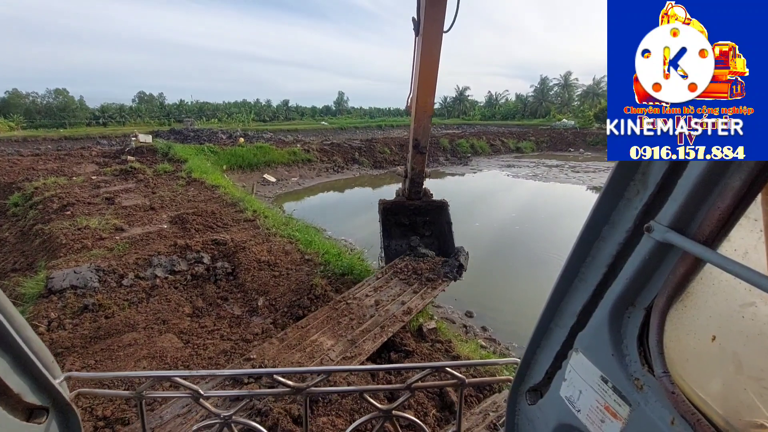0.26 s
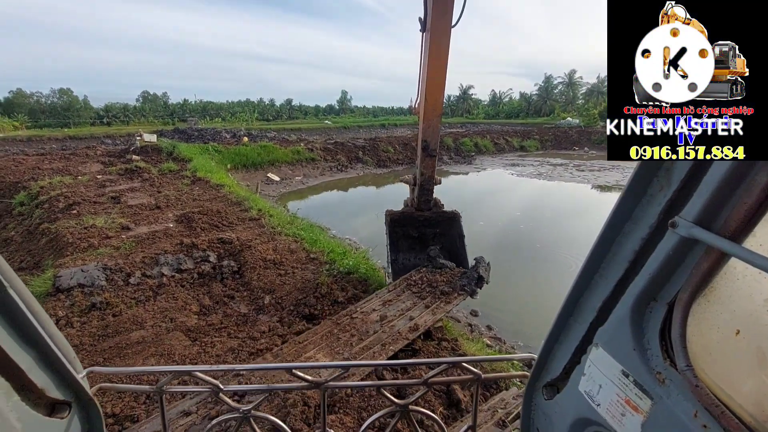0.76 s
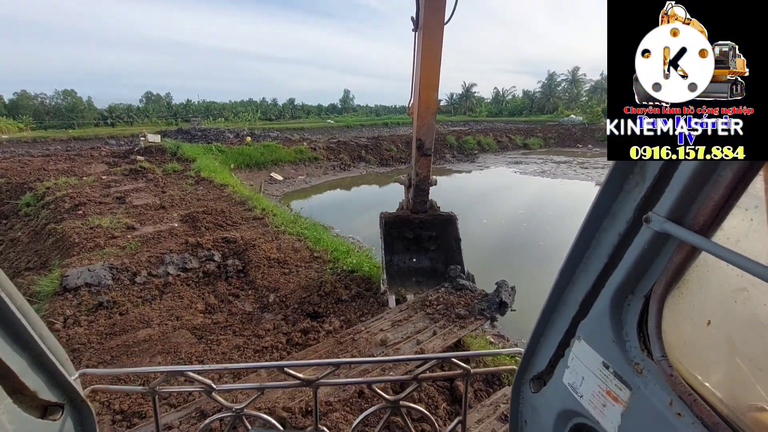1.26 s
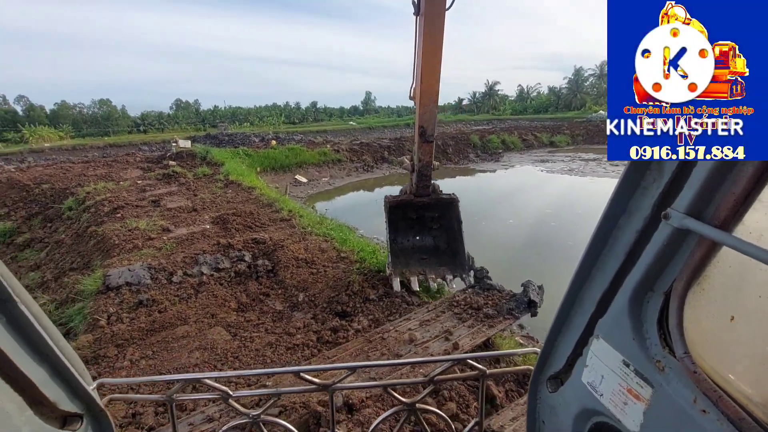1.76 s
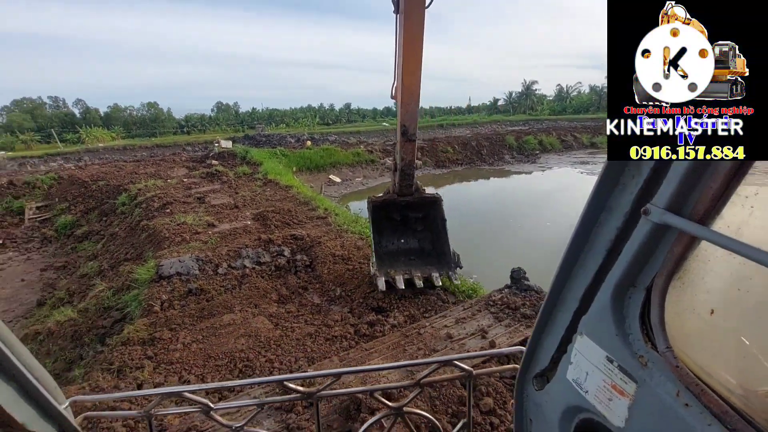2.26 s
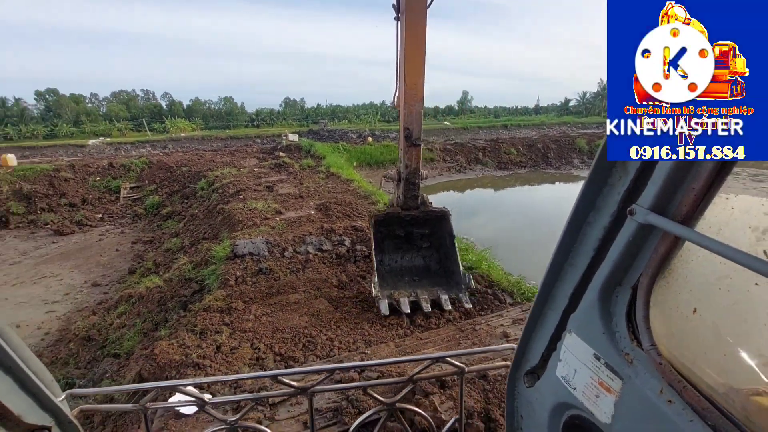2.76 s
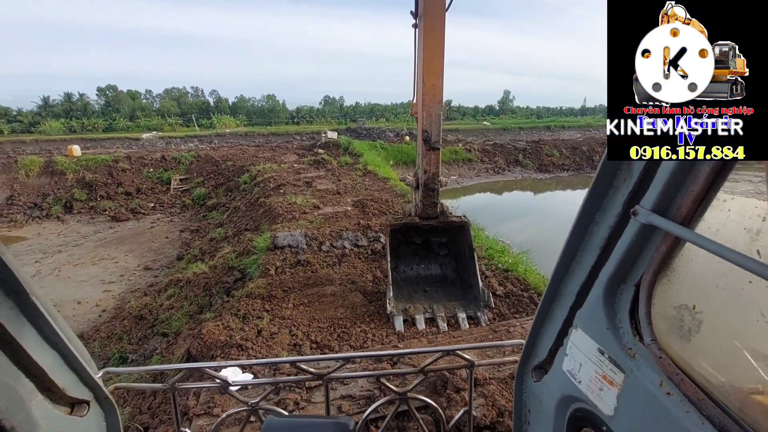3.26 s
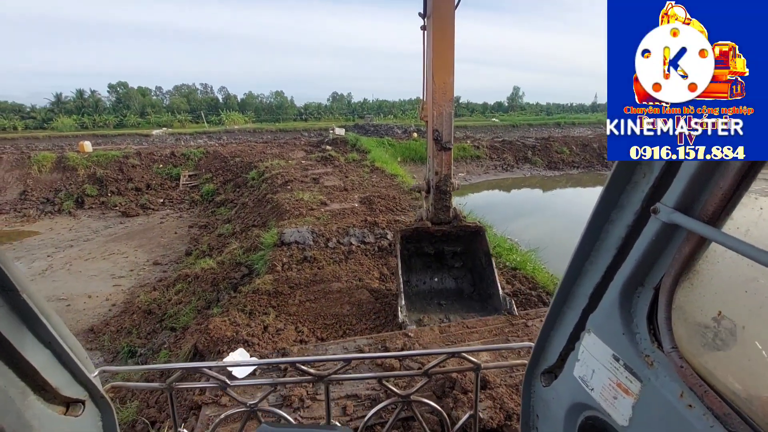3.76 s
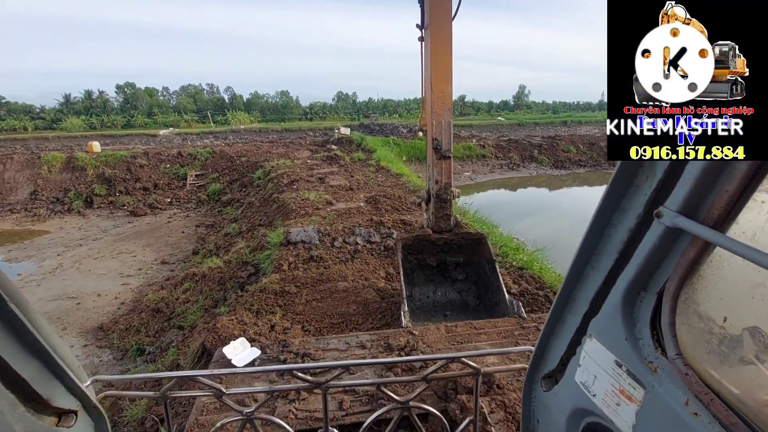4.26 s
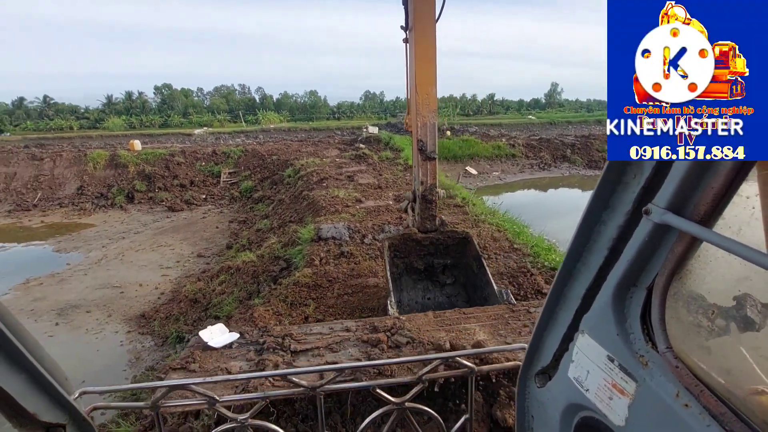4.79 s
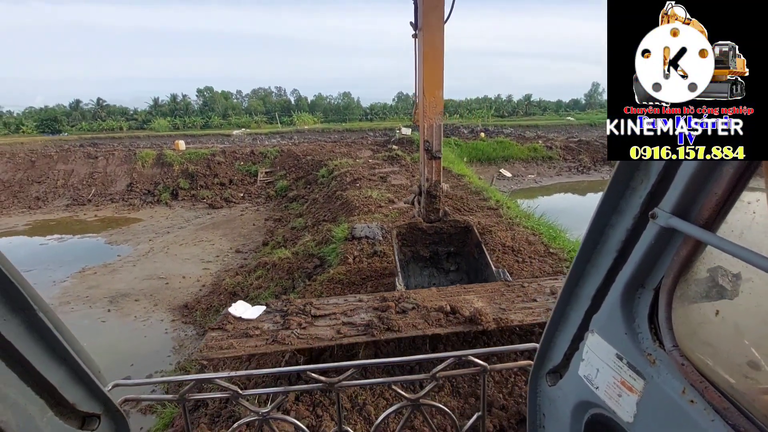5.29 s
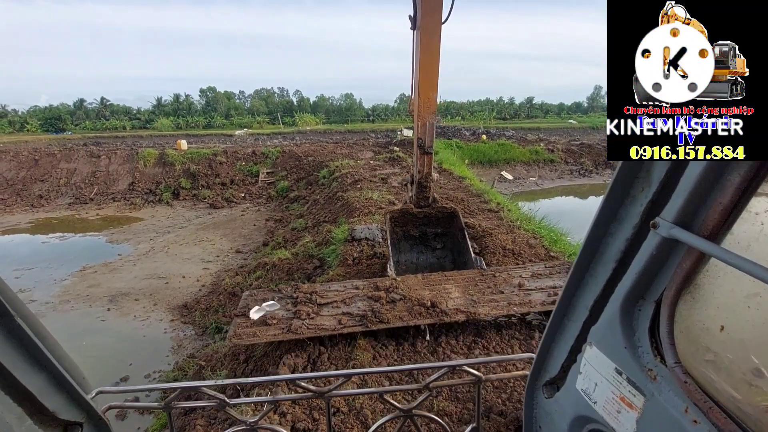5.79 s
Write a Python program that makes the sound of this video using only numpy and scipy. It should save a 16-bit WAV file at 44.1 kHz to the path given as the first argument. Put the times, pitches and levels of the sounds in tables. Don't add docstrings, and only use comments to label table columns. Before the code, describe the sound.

A heavy digger works as heard from its seat: a muffled diesel drone beneath booming cab panels, dull frame blows, bright pin taps and thin hydraulic hiss. Clatter comes in bursts, strongest early and again near three seconds, with a quieter middle between. Around four seconds dry joints squeak softly, then a swing motor hum and gear whine rise among renewed knocks. Close, boxy, bass-heavy stereo sound, with peaks softly squashed.

```python
import sys
import numpy as np
from scipy import signal
from scipy.io import wavfile
from scipy.ndimage import uniform_filter1d

SR = 44100
rng = np.random.default_rng(int(sys.argv[2]) if len(sys.argv) > 2 else 0)


def decibels_to_gain(level_db):
    exponent = np.asarray(level_db, float) / 20
    return 10 ** exponent


def wrap_up_sound(samples):
    columns = np.atleast_2d(samples).T
    tamed = np.clip(columns, -1, 1)
    steps = np.round(tamed * 32767).astype(np.int16)
    wavfile.write(sys.argv[1], SR, steps)


N = 265923

# hz, width_hz, level_db
CAB_MODES = [(58.4, 48, -5), (68.3, 24, -4.5), (132.5, 20, 3.5), (160.7, 23, -5.5), (230.2, 17.3, -3),
             (282.9, 27, -6.5), (392, 15, -7), (447, 180, -11)]
# hz, level_db (per Hz)
RUMBLE = [(15, -43), (25, -50), (54, -28), (144, 1), (188, -11.5), (247, -7), (332, -14.5), (385, -14),
          (846, -20), (1060, -22), (1650, -22.5), (2690, -35), (9000, -60), (11700, -90), (19800, -120)]
# peak_s, level_db, length_s
LURCHES = [(.1, -18, 0.037), (.33, -9, 0.14), (.42, -7, 0.0089), (.55, -23, 0.28), (1.07, -8, 0.062),
           (1.21, -3, 0.1), (1.405, -6.5, 0.12), (2.35, -20, 0.019), (2.47, -28, .04), (2.66, -10, 0.088),
           (2.79, -6.5, 0.2), (2.94, -3, 0.036), (3.04, -16, 0.022), (3.125, -8.5, 0.12),
           (3.295, -15, 0.075), (3.375, -2, 0.012), (3.458, -2.5, 0.014), (3.58, -8, 0.044),
           (4.12, -12, 0.097), (4.38, -20, 0.035), (4.58, -22, 0.1), (4.89, -8.5, 0.11), (4.99, -6, 0.037),
           (5.13, -4, 0.03), (5.3, -6, 0.034), (5.42, -10, 0.082), (5.62, -6.5, 0.25), (5.89, -23, 0.027),
           (6.0, -3, 0.017)]
# peak_s, level_db, length_s
SURGES = [(.05, -28, 0.24), (.2, -27.5, 0.17), (.36, -48, .04), (1.27, -46, 0.034), (1.9, -32.5, 0.044),
          (3.0, -29, 0.029), (5.32, -30, .06), (5.97, -23.5, 0.11), (2.75, -30, 0.11), (3.57, -40, 0.038),
          (1.17, -23, .03), (4.05, -37, 0.13)]


def cab_rumble():
    lurch = swells(LURCHES, rise_share=0.71, fall_share=0.59)
    boom_gain = np.sqrt(decibels_to_gain(2 * follows(-18, 0.96)) + decibels_to_gain(2 * -8) * lurch)
    drum_gain = np.sqrt(decibels_to_gain(2 * follows(-22, 1)) + decibels_to_gain(2 * -10.5) * lurch)
    clatter_gain = np.sqrt(decibels_to_gain(2 * follows(-33.5, 1.15)) + swells(SURGES, 0.79, 0.52))
    white = rng.standard_normal((2, 2, N))
    jolts = rng.standard_normal((2, N)) * decibels_to_gain(2.0 * drift(19.0))
    modes = []
    for hz, width_hz, db in CAB_MODES:
        ring = resonance(resonance(jolts, hz, 1.04 * width_hz), hz, 1.04 * width_hz)
        modes.append(decibels_to_gain(db) * pair(ring, hz) / np.sqrt(width_hz))
    boom = rms_one(sum(modes[:4])) + 0.5 * coloured(white, RUMBLE, 35.4, 191.0, count=5, patchy_db=2.5)
    drum = 0.62 * rms_one(sum(modes[4:]))
    drum = drum + 0.77 * coloured(white, RUMBLE, 193.0, 908, count=5, patchy_db=2.5)
    touches = (rng.random(N) < 300 / SR) * decibels_to_gain(0.71 * np.minimum(rng.exponential(1, N), 3))
    rattle = 1 + 0.35 * signal.lfilter([1], [1, -0.99], touches)
    clatter = coloured(white * rms_one(rattle), RUMBLE, 800, 9000, count=8, patchy_db=0.8)
    return boom_gain * evened(boom, span_s=0.08) + drum_gain * drum + clatter_gain * clatter


# start_s, peak_db, pitch_hz, length_s
MODE_JOLTS = [(.075, -15, 131, .045), (0.242, -9, 68, 0.17), (.326, -1, 136.5, 0.029),
              (0.404, 0.5, 130.5, 0.022), (1.152, -26, 289.5, 0.23), (1.185, -14, 148, 0.027),
              (1.197, -14, 74.4, 0.064), (1.388, -5.5, 133, 0.04), (1.695, -18, 525, 0.023),
              (1.722, -16.5, 411, 0.028), (2.629, -8.5, 77, 0.041), (2.72, -9, 226.5, 0.042),
              (2.767, -5.5, 120, 0.035), (2.916, -9.5, 126, 0.048), (2.976, -8.5, 378.7, 0.047),
              (2.997, -11, 229.7, 0.066), (3.025, -11, 137, 0.041), (3.1, -9, 140, 0.057),
              (3.134, -11.5, 60, 0.1), (3.27, -8.5, 136, 0.06), (3.302, -9.5, 67.7, 0.057),
              (3.359, -5.5, 140, 0.03), (3.447, 2, 139, 0.018), (3.473, -12.5, 466.5, 0.042),
              (3.486, -13.5, 422, 0.028), (3.547, -14.5, 297.4, 0.053), (3.602, -19.5, 229.4, 0.084),
              (4.87, -7.5, 134, 0.025), (4.95, -7, 135.8, 0.078), (5.185, -13, 139, .04),
              (5.258, -2, 138.4, 0.051), (5.4, -6, 135.7, 0.072), (5.459, -13.5, 379, 0.075),
              (5.58, -6.5, 154, 0.038), (5.602, -26, 67.4, 0.33), (5.621, -5.5, 238, 0.025),
              (5.659, -20, 129, 0.055), (5.872, -12, 134, 0.026), (5.988, -8, 143, 0.022),
              (1.363, -6, 895, 0.0048), (1.373, -11, 493, 0.013), (1.395, -8, 1220, 0.0032),
               (1.487, -23, 1100, 0.0046), (1.146, 0.5, 387, 0.006), (1, -17, 2100, 0.0028),
               (3.337, -15, 2400, .003), (3.464, -22, 3030, 0.0034), (.06, -26, 217, 0.135),
               (3.11, -10.5, 350, 0.026), (4.9, -14, 306, 0.027), (5.073, -6.5, 330, 0.018),
               (0.141, -15, 260, 0.027), (0.187, -11.5, 259, .03), (2.937, -8.5, 275, 0.021),
               (3.057, -19, 250, 0.02), (2.5, -10, 267, 0.02), (.662, -14.5, 437, 0.017),
               (3.4, -10.5, 453, 0.015)]


def booms():
    peak_share, sag = 0.35, 0.0291
    out = np.zeros(N + SR)
    for s, db, hz, length in MODE_JOLTS:
        t = np.arange(round(4 * length * SR)) / SR
        grown = t / (peak_share * length)
        tone = np.sin(2 * np.pi * hz * t * (1 - sag * t / length))
        at = round(s * SR)
        out[at:at + len(t)] += decibels_to_gain(db) * grown * np.exp(1 - grown) * tone
    return out[:N] * decibels_to_gain(np.array([[-1.3], [1.3]]))


# start_s, peak_db, pitch_hz, chatter_s
SLAMS = [
    (.393, -4.5, 2680, 0.0084),
    (1.139, -3, 3360, 0.014),
    (2.993, -5, 4530, 0.012),
]
# start_s, peak_db, pitch_hz, chatter_s
PINS = [
    (.549, -16.5, 1910, 0.019),
    (.799, -25, 730, 0.037),
    (1.124, -18, 719, 0.028),
    (1.848, -15.5, 1690, 0.041),
    (2.407, -21.5, 1120, 0.017),
    (2.699, -17.5, 855, 0.053),
    (4.07, -21.5, 1164, 0.12),
    (4.304, -25, 1150, 0.033),
    (4.628, -24, 760, 0.0059),
]
# start_s, peak_db, pitch_hz, chatter_s
LATCH = [
    (.993, -22, 1090, 0.013),
    (1.214, -13.5, 2140, 0.031),
    (1.419, -18, 1750, 0.028),
    (2.464, -22, 1010, 0.035),
    (2.499, -21, 990, 0.021),
    (2.923, -15.5, 1900, 0.006),
    (3.462, -14, 2000, 0.011),
    (3.337, -16.5, 3970, 0.011),
]
# start_s, peak_db, pitch_hz, chatter_s
DOOR = [(.326, -4.5, 930, 0.0038), (.409, -9, 900, 0.023), (.664, -23, 910, 0.0037),
        (1.04, -10.5, 1050, 0.005), (1.25, -16, 875, 0.015), (1.364, -1.5, 980, 0.012),
        (1.378, -10, 493, 0.026), (1.395, -6.5, 1160, 0.004), (1.486, -22.5, 1000, 0.006),
        (1.696, -17, 830, 0.038), (1.727, -18, 1630, 0.022), (1.986, -14.5, 813, 0.036),
        (2.022, -18.5, 2250, 0.03), (2.313, -15, 845, 0.024), (2.814, -18, 1730, 0.0074),
        (3.108, -15, 1050, 0.011), (3.374, -17.5, 1840, 0.021), (3.45, -7.5, 1080, 0.0088),
        (2.981, -16, 1300, 0.014), (3.6, -20, 1120, 0.021), (3.832, -11, 440, 0.015),
        (3.909, -16, 1050, 0.09), (4.849, -11.5, 980, 0.057), (5.619, -2.5, 447, 0.0089)]
# start_s, peak_db, pitch_hz, chatter_s
FRAME = [(.199, -15, 1050, 0.018), (.283, -15, 960, 0.015), (.503, -18.5, 780, 0.061),
         (1.146, -5.5, 607, 0.0091), (1.153, -9.5, 1988, 0.025), (1.45, -37, 290, .06),
         (1.523, -17, 380, 0.038), (3.02, -10, 251, 0.019), (3.84, -13, 212, 0.097),
         (1.942, -17, 1700, 0.037), (2.105, -19, 2300, 0.043), (2.599, -15.5, 2000, 0.006),
         (3.545, -15, 1080, 0.06), (3.858, -15, 940, 0.031), (4.337, -24, 1190, 0.008),
         (5.115, -15.5, 960, 0.034), (5.473, -10, 930, 0.059), (5.592, -4.5, 844, 0.024),
         (1.652, -27, 1490, .01), (1.668, -30, 2600, 0.0089), (2.06, -20, 846, 0.014),
         (2.142, -19, 1540, 0.015), (2.178, -23, 2360, 0.012), (2.286, -45, 860, .01),
         (3.089, -23, 720, .01), (3.189, -33, 790, 0.012), (3.268, -23, 1400, 0.016),
         (3.295, -19.5, 890, 0.0088), (.35, -18, 880, 0.023), (1.27, -23, 2000, 0.014),
         (5.31, -15.5, 3030, 0.018), (5.612, -17, 1300, 0.023), (3.0, -13, 890, 0.026),
         (3.48, -14.5, 1190, 0.034), (2.304, -17, 1700, 0.012), (2.996, -10.5, 2140, 0.022),
         (2.317, -20.5, 2390, 0.016), (2.544, -27.5, 2200, 0.0096), (2.26, -43, 2200, .01)]
# hz, width_hz, level_db
STEEL_MODES = [(867, 210, -2), (1050, 130, -9.5), (1300, 92, -10.5), (1750, 115, -7), (2000, 150, -8),
               (2380, 230, -13.5)]
# hz, width_hz, level_db
PANEL_MODES = [(295.5, 28, 5), (433.7, 28, 1.5), (405, 87, 4), (502, 76, -4), (598, 4.3, -15)]
# hz, width_hz, level_db
CRACK_MODES = [(2680, 380, 22), (3340, 400, 14), (3840, 510, 14), (4500, 1260, 14), (6150, 830, 6),
               (7300, 850, -40)]


def knocks():
    out, size = np.zeros((2, N + SR)), SR // 6
    t = np.arange(size) / SR
    kinds = [(SLAMS, 0, -12), (PINS, -1.7, -8), (LATCH, 5.2, -7), (DOOR, 2.3, -28.5), (FRAME, 0, -20.5)]
    for blows, panel_db, crack_db in kinds:
        for s, db, hz, chatter_s in blows:
            contact = np.exp(-(t / np.clip(chatter_s, 0.004, 0.08)) ** 1.05) + 0.12 * np.exp(-t / 0.03)
            bounces = rng.standard_normal((2, size))
            edges = np.sign(bounces) * rms_one(np.abs(bounces) ** 1.27) * contact
            rise_s = 0.0019 * decibels_to_gain(-0.35 * db)
            chatter = edges * np.minimum(t / rise_s, 1)
            chatter[0, :30] += 1.6 * decibels_to_gain(0.35 * db) * np.hanning(30)
            own_ring = (hz, 0.13 * hz, -5 * np.log2(hz / 1000))
            clank = struck(chatter, STEEL_MODES + [own_ring])
            panel = struck(chatter, PANEL_MODES)
            crack = struck(edges * np.exp(-t / (4.2 * chatter_s)), CRACK_MODES)
            dull_hz = 3620 * (max(hz, 700) / 1500) ** 0.18
            body = dulled(clank + decibels_to_gain(panel_db - 1.5) * panel, dull_hz)
            at = round(s * SR)
            out[:, at:at + size] += decibels_to_gain(db - 1.5) * (body + decibels_to_gain(crack_db) * dulled(crack, 5800))
    return out[:, :N]


def struck(chatter, modes):
    luck_db = rng.normal(0, 2.5, len(modes))
    out = 0
    for (hz, width_hz, db), extra_db in zip(modes, luck_db):
        ring = resonance(resonance(chatter, hz, width_hz), hz, 4 * width_hz)
        out = out + decibels_to_gain(db + extra_db) / np.sqrt(width_hz) * pair(ring, hz)
    return out / np.abs(out.mean(axis=0)).max()


# hz, width_hz, level_db (re the touch)
SHEET_MODES = [(447, 5.9, -16.5), (583.6, 15, -4), (653, 4.4, -9.5), (850.4, 12.6, 1), (1010, 8.4, -10),
               (1295, 6.9, -4.5), (1640, 15, 1.5), (1980, 14, -9), (2350, 27, -2), (3250, 18, 2),
               (3550, 12, -14), (3940, 45, -6), (4260, 27, 2.5), (4700, 16, -7)]


def sheet_steel(x):
    return x + sum(decibels_to_gain(db) * resonance(x, hz, width_hz) for hz, width_hz, db in SHEET_MODES)


# time_s, twice_firing_hz, level_db
DIESEL = [(0, 256, -23), (.3, 258, -25), (.5, 259, -32), (.7, 260, -28), (1.0, 256, -28), (1.2, 256, -32),
          (1.6, 260, -40), (2.5, 264, -36), (2.9, 266, -30), (3.4, 266, -30), (3.8, 264, -38),
          (4.6, 266, -33), (5.2, 268, -28), (5.72, 260, -27), (5.86, 259, -14), (6.03, 260, -12)]
# multiple, level_db
FIRING_ORDERS = [(.5, -17), (1, -5), (2, 0), (3, -15), (5, -24), (6, -29)]


def diesel():
    twice_hz, level_db = in_time(DIESEL)
    turn = np.pi * np.cumsum(twice_hz * (1 + 0.003 * drift(8.2))) / SR
    tone = sum(decibels_to_gain(db + 0.46 * drift(1.4)) * np.sin(order * turn) for order, db in FIRING_ORDERS)
    return np.sqrt(2) * decibels_to_gain(level_db) * tone * decibels_to_gain(np.array([[-1.3], [1.3]]))


# hz, level_db (per Hz)
HISS = [(3240, -46), (5500, 7), (6810, -29), (7420, 1.5), (8880, -7), (10400, 0.5), (11800, 1.5),
        (12700, 0.5), (14300, -10), (15300, -4)]
# hz, width_hz, level_db (re the hiss)
WHISTLES = [(7200, 60, -17), (11030, 40, -16), (11368, 30, -11), (11709, 40, -13), (12068, 40, -13),
            (12177, 35, -11), (12523, 40, -15)]
# peak_s, level_db, length_s
PUFFS = [(.05, -48, .2), (.4, -54, 0.016), (.56, -50, 0.062), (.8, -51, 0.15), (1.008, -44, 0.0074),
         (1.13, -47.5, 0.072), (1.23, -56, 0.026), (1.345, -44, 0.015), (1.425, -52, 0.046),
         (1.68, -58, 0.12), (2.17, -56.5, 0.035), (2.36, -43.5, 0.023), (2.43, -45.5, 0.044),
         (2.75, -46, 0.2), (2.98, -46, 0.14), (3.28, -37.5, 0.032), (4.08, -47.5, 0.075), (4.32, -58, .05),
         (4.53, -52, 0.067), (4.9, -46, 0.04), (5.25, -30, 0.012), (5.29, -36, 0.011), (5.41, -38, 0.087),
         (5.85, -42.5, 0.13), (6.0, -43, 0.036)]


def valves():
    hiss_db = 10 * np.log10(decibels_to_gain(2 * follows(-58, 1)) + swells(PUFFS, rise_share=1, fall_share=1.5))
    white = rng.standard_normal((2, 2, N))
    piston_hz = 360 * (1 + 0.0244 * drift(4.4))
    chop = 1 + 0.14 * np.sin(2 * np.pi * np.cumsum(piston_hz) / SR)
    jet = coloured(white, HISS, 5433, 15440, count=8, patchy_db=2.0)
    whistle = 0
    for hz, width_hz, db in WHISTLES:
        whistle = whistle + decibels_to_gain(db) * rms_one(resonance(resonance(white[0], hz, width_hz), hz, width_hz))
    open_wide = np.clip((hiss_db + 50) / 10, 0, 1)
    return decibels_to_gain(hiss_db - 1.0) * (chop * jet + open_wide * whistle * decibels_to_gain(np.array([[-1.5], [3]])))


# start_s, peak_db
TICKS = [(0.405, -32), (0.5202, -33), (0.999, -28), (1.0994, -32), (1.2294, -33), (1.419, -30.5),
         (2.1494, -46), (2.9994, -37), (3.4515, -39), (3.462, -40), (3.576, -51), (3.616, -53.5),
         (2.05, -46), (4.3041, -41), (4.6219, -35), (4.9023, -34), (5.2415, -45), (1.668, -45),
         (1.697, -50), (1.729, -46), (1.942, -40), (1.988, -39), (2.107, -40), (2.178, -41), (2.2, -37),
         (2.303, -38), (2.464, -46), (2.499, -47), (3.338, -42), (3.366, -44), (3.83, -50), (1.364, -35),
         (1.142, -30)]


def ticks():
    out, size = np.zeros((2, N + SR)), SR // 20
    for s, db in TICKS:
        snap = rng.standard_normal((2, size)) * np.exp(-np.arange(size) / SR / 0.009)
        at = round(s * SR)
        out[:, at:at + size] += decibels_to_gain(db - 4.5) * band(snap, 3900, 14000)
    return out[:, :N]


# start_s, length_s, level_db
PLATE_RINGS = [(.45, .03, -61), (1.33, .04, -54), (1.14, .05, -50), (1.435, .13, -59), (1.85, .04, -53),
               (2.03, .03, -58), (2.11, .06, -58), (2.31, .14, -54), (3.0, .05, -50), (3.39, .03, -55),
               (1.73, .05, -61)]
# start_s, length_s, level_db
BAR_RINGS = [
    (.545, .03, -33),
    (1.148, .04, -23.5),
]
# start_s, length_s, from_hz, to_hz, level_db
JOINT_SQUEAKS = [
    (3.9, .19, 3150, 3600, -49),
    (3.95, .22, 3250, 3400, -50),
    (4.485, .115, 4500, 8000, -55),
    (3.93, .2, 4150, 4250, -57),
    (4.03, .12, 7500, 7700, -62),
]


def squeaks():
    out, rough, slips = np.zeros(N), drift(240), drift(78)
    tones = [(s, length, 8180, 8180, db, 0, 0.005) for s, length, db in PLATE_RINGS]
    tones += [(s, length, 2000, 2000, db, 0, 0.02) for s, length, db in BAR_RINGS]
    for s, length, from_hz, to_hz, db in JOINT_SQUEAKS:
        overtone = decibels_to_gain(-14 + 17 * (to_hz / from_hz - 1))
        tones.append((s, length, from_hz, to_hz, db, overtone, 0.045))
    for s, length, from_hz, to_hz, db, overtone, wobble in tones:
        at, size = round(s * SR), round(length * SR)
        part = np.arange(size) / size
        pitch_hz = (from_hz + (to_hz - from_hz) * part ** 1.4) * (1 + wobble * rough[at:at + size])
        turn = 2 * np.pi * np.cumsum(pitch_hz) / SR
        shape = np.minimum(part / 0.1, 1) * np.sqrt(1 - part) * decibels_to_gain(db + 4 * slips[at:at + size])
        out[at:at + size] += shape * (np.sin(turn) + overtone * np.sin(2 * turn))
    return out


# time_s, pitch_hz, level_db
SWING_MOTOR = [
    (.9, 165, -53),
    (1.2, 165.6, -21),
    (1.6, 162, -36),
    (1.9, 163.6, -55),
    (4.2, 149, -57),
    (4.55, 152, -22),
    (5.0, 170, -33),
    (5.5, 169.8, -17),
    (6.03, 161, -26),
]


def swing_motor():
    hz, level_db = in_time(SWING_MOTOR)
    turn = 2 * np.pi * np.cumsum(hz * (1 + 0.0093 * drift(9.9))) / SR
    started = np.arange(N) > SWING_MOTOR[0][0] * SR
    return decibels_to_gain(level_db + 2.0 * drift(4.2)) * np.sin(turn) * started


# time_s, mesh_hz, level_db
GEAR = [
    (3.9, 410, -41),
    (4.15, 395, -39),
    (4.4, 352, -38),
    (4.8, 372, -38),
    (5.2, 415, -30),
    (5.5, 418, -32),
]


def swing_gear():
    mesh_hz, level_db = in_time(GEAR)
    t = np.arange(N) / SR
    engaged = np.clip((t - GEAR[0][0]) / 0.11, 0, 1) * np.clip((GEAR[-1][0] - t) / 0.024, 0, 1)
    turn = 2 * np.pi * np.cumsum(mesh_hz * (1 + 0.0041 * drift(1.82))) / SR
    return engaged * decibels_to_gain(level_db + 3 * drift(8)) * (np.sin(turn) + 0.25 * np.sin(2 * turn))


# time_s, pitch_hz, level_db
FAN = [
    (.4, 288.7, -43),
    (.62, 291, -34.5),
    (1.0, 287, -36),
    (1.14, 283.5, -40),
    (1.2, 289, -23),
    (1.55, 286.8, -28),
    (1.8, 289, -42),
    (2.1, 283, -47),
]


def fan():
    hz, level_db = in_time(FAN)
    t = np.arange(N) / SR
    turn = 2 * np.pi * np.cumsum(hz * (1 + 0.003 * drift(4))) / SR
    return decibels_to_gain(level_db) * np.sin(turn) * (t > FAN[0][0]) * (t < FAN[-1][0])


# time_s, level_db
SHAKE = [(0.0, -13.5), (0.25, -15), (0.44, -21.5), (0.91, -23.5), (1.31, -21.5), (1.53, -30), (1.76, -26.5),
         (2.08, -23.5), (2.45, -22.5), (2.87, -16.5), (3.49, -19.5), (3.66, -24), (4.38, -23.5), (4.6, -23),
         (5.14, -15), (5.48, -16), (5.86, -16), (6.03, -15.5)]


def follows(mean_db, swing_share):
    shake_db, = in_time(SHAKE)
    return mean_db + swing_share * (shake_db - shake_db.mean())


def swells(rows, rise_share, fall_share):
    t = np.arange(0, N + 40, 40) / SR
    power = 0
    for s, db, length in rows:
        side_s = length * np.where(t < s, rise_share, fall_share)
        power = power + decibels_to_gain(2 * db) * np.exp(-2 * np.abs(t - s) / side_s)
    return np.interp(np.arange(N) / SR, t, power)


# hz, likeness (0 to 1)
LIKENESS = [(60, 0.98), (180, 0.96), (540, 1), (1640, 0.25), (4920, 0.085), (14800, 0.17)]
# hz, left_minus_right_db
LEAN = [(60, -2.5), (130, -3), (290, -4), (640, 1), (1400, -9.5), (3070, -1.5), (6750, 5), (14800, -8)]


def pair(mid_side, hz):
    alike = np.clip(at_hz(LIKENESS, hz), 0, 1)
    both = np.sqrt(1 + alike) * mid_side[0] + np.sqrt(1 - alike) * mid_side[1] * [[1], [-1]]
    return both * decibels_to_gain(at_hz(LEAN, hz) / 2 * np.array([[1], [-1]]))


def coloured(white, spectrum, low_hz, high_hz, count, patchy_db):
    out, edges, shared = 0, np.geomspace(low_hz, high_hz, count + 1), drift(5.6)
    for k, (low, high) in enumerate(zip(edges, edges[1:])):
        hz = np.sqrt(low * high)
        gain = decibels_to_gain(at_hz(spectrum, hz) + patchy_db * (0.4 * shared + drift(11.2)))
        out = out + gain * pair(band(white[k % 2], low, high), hz)
    return out / np.std(out.mean(axis=0))


def evened(x, span_s):
    power = uniform_filter1d(np.mean(x ** 2, axis=0), round(span_s * SR))
    return rms_one(x / (power + 1e-3) ** 0.45)


def resonance(x, hz, width_hz):
    r = np.exp(-np.pi * width_hz / SR)
    poles = [1, -2 * r * np.cos(2 * np.pi * hz / SR), r * r]
    return signal.lfilter([(1 - r * r) / 2, 0, (r * r - 1) / 2], poles, x)


def band(x, low_hz, high_hz):
    return signal.sosfilt(signal.butter(2, [low_hz, high_hz], "band", fs=SR, output="sos"), x)


def dulled(x, hz):
    return signal.sosfilt(signal.butter(2, hz, fs=SR, output="sos"), x)


def drift(rate_hz):
    r = np.exp(-80 * np.pi * rate_hz / SR)
    chance = rng.standard_normal(N // 40 + 2002)
    slow = signal.lfilter([1], [1, -2 * r, r * r], chance)[2000:]
    return np.interp(np.arange(N) / 40, np.arange(len(slow)), rms_one(slow))


def rms_one(x):
    return x / np.sqrt(np.mean(x ** 2) + 1e-20)


def in_time(rows):
    s, *columns = np.transpose(rows)
    return [np.interp(np.arange(N) / SR, s, column) for column in columns]


def at_hz(points, hz):
    table_hz, values = np.transpose(points)
    return np.interp(np.log(hz), np.log(table_hz), values)


def scene():
    lag = 11
    rumble = cab_rumble()
    left, right = diesel() + swing_gear() + valves() + booms()
    rumble[0] = np.roll(rumble[0], lag)
    machine = np.array([np.roll(left, lag), right])
    cab = sheet_steel(rumble + knocks())
    return machine + cab + ticks() + squeaks() + swing_motor() + fan() + fan()


def top_cut(x):
    return signal.sosfilt(signal.butter(12, 15400, fs=SR, output="sos"), x)


def record(dry):
    ported = signal.sosfilt(signal.butter(2, 36, "high", fs=SR, output="sos"), dry)
    mix = 1.042 * np.tanh(ported / 1.169)
    return top_cut(mix)


dry = scene()
out = record(dry)
wrap_up_sound(out)
```